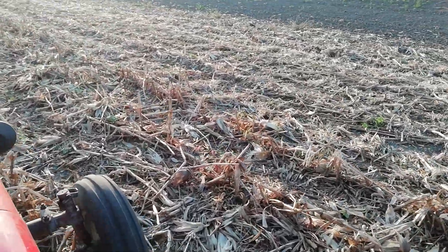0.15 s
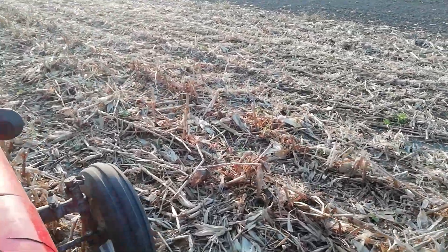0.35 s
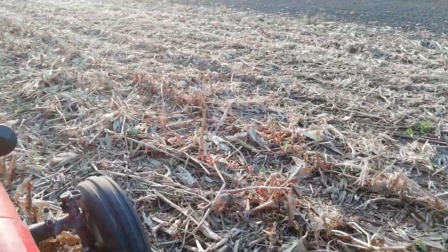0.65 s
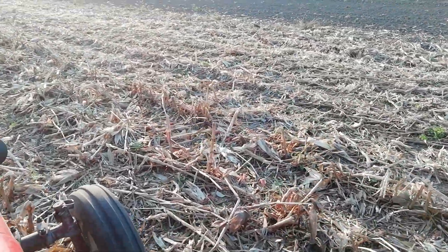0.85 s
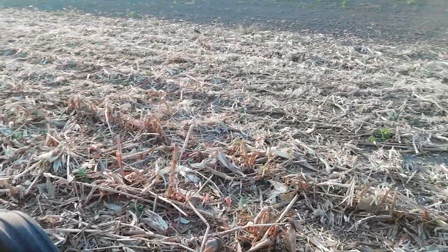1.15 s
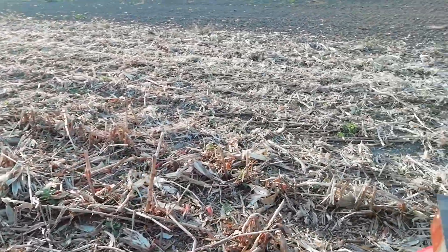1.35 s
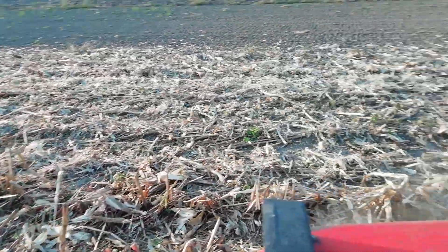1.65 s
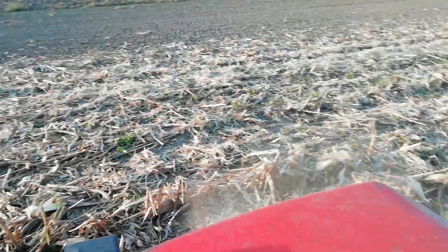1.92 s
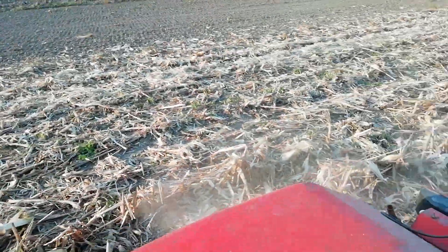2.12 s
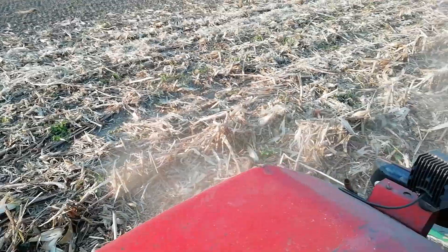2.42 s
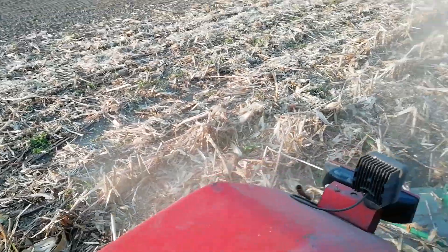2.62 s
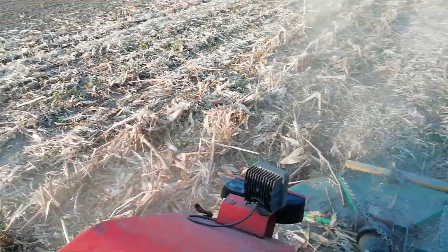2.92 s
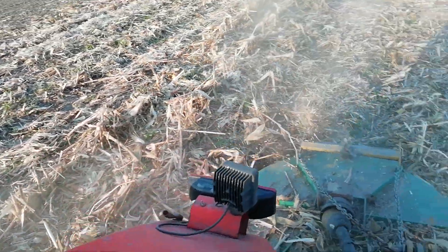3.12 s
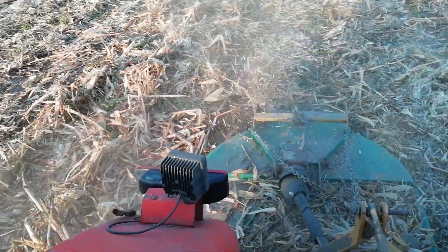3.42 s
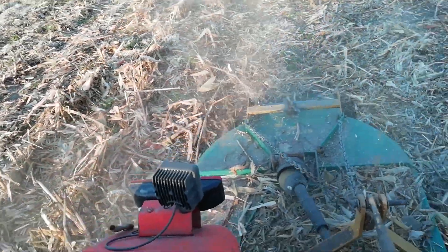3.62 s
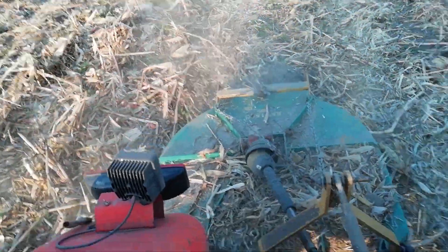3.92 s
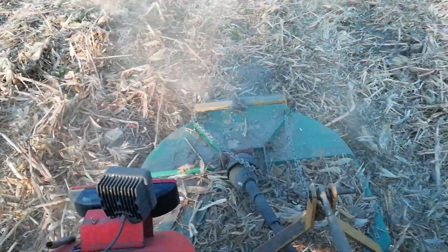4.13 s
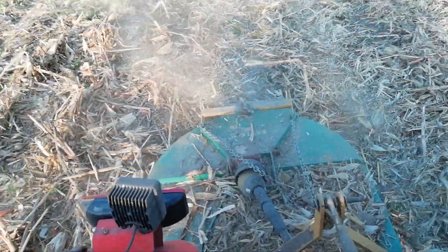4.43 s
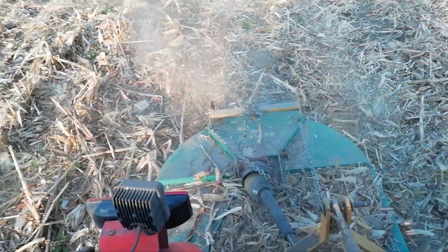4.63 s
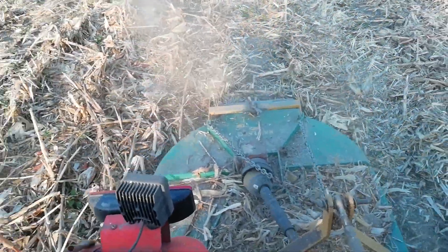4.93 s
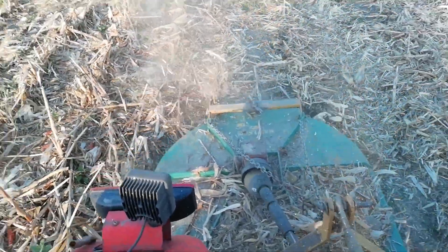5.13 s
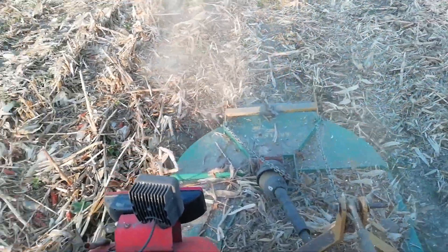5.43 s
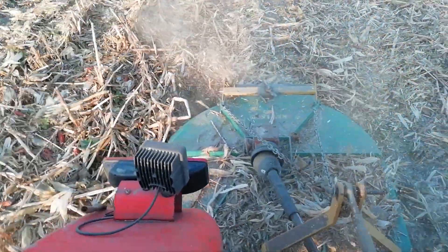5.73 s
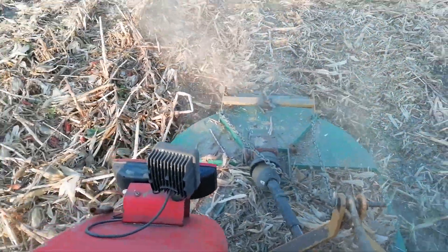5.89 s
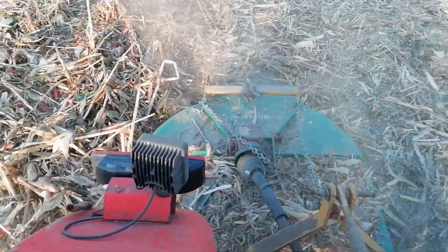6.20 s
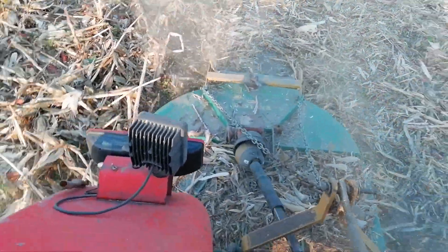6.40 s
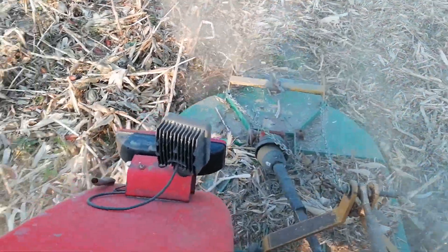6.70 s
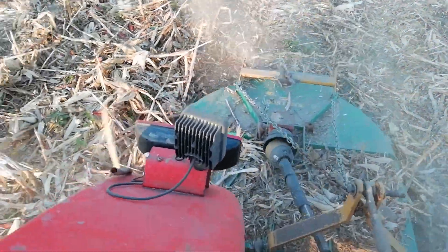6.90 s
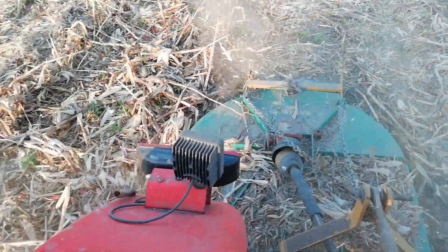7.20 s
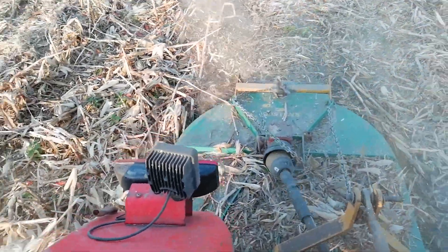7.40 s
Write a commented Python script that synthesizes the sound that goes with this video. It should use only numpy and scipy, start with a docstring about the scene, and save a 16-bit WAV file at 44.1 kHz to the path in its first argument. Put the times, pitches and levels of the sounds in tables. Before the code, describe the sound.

Heard from a tractor seat in an open field: a diesel engine drones and clatters steadily with a thin gear whine, over rushing hiss. After about a second and a half the microphone swings back to the rotary mulcher; whine and clatter recede, while a fast-throbbing roar and crackling hiss take over, with hard stalk strikes singly and in rapid bursts. The level ducks abruptly.

```python
"""A clattering diesel engine, then a throbbing, crackling hiss: a rotary mulcher behind a tractor in dry maize.
The microphone is at the driver's seat. It faces the engine ahead, then turns back towards the mulcher.
Engine tones are sines locked to the firing rate; clatter, roar and hiss are coloured noise that pulses with
the firings or with about 44 blade passes a second. Bursts of noise make the hard strikes. The recorder ducks
abruptly: some dips are written into the level curves, and a limiter adds more on peaks."""
import sys
import numpy as np
from scipy import signal
from scipy.fft import rfft, irfft, next_fast_len
from scipy.io import wavfile
from scipy.ndimage import uniform_filter1d, map_coordinates

SR = 44100
rng = np.random.default_rng(int(sys.argv[2]) if len(sys.argv) > 2 else 0)


def dump_mix(stems):
    """Bounce the given channels to the path in sys.argv[1] as a 16-bit WAV at rate SR."""
    frames = np.atleast_2d(stems).T  # one column per channel
    limited = np.clip(frames, -1, 1)  # hard clip at full scale
    pcm = np.round(limited * 32767).astype(np.int16)
    wavfile.write(sys.argv[1], SR, pcm)


N = 332955


def amp(db):
    """Decibels to gain."""
    return 10 ** (np.asarray(db) / 20)


def unit(x):
    """Scaled to rms 1."""
    return x / np.sqrt(np.mean(x ** 2) + 1e-20)


def along(points, hz):
    """Values of a (pitch_hz, value) table, read on a log frequency axis."""
    f, v = np.transpose(points)
    return np.interp(np.log(hz + 1), np.log(f + 1), v)


def curves(rows):
    """One value per sample for each column after the time."""
    s, *cols = np.transpose(rows)
    return [np.interp(np.arange(N) / SR, s, c) for c in cols]


def wobble(rate):
    """A smooth random curve through rate knots a second."""
    knots = rng.standard_normal(int(N * rate / SR) + 4)
    coarse = np.arange(0, N + 32, 32)  # samples
    values = map_coordinates(knots, [coarse * rate / SR])
    return np.interp(np.arange(N), coarse, values)


def filtered(x, response):
    """The sound x with its spectrum multiplied by a response of frequency."""
    m = next_fast_len(N + SR // 4, True)
    spectrum = rfft(x, m) * response(np.fft.rfftfreq(m, 1 / SR))
    return irfft(spectrum, m)[..., :N]


def add(track, s, sound):
    """Mix a sound into the track at time s."""
    part = track[..., max(round(s * SR), 0):][..., :sound.shape[-1]]
    part += sound[..., :part.shape[-1]]


def leaned(channels, tilt):
    """Left and right set apart by a tilt table, half of it on each side."""
    return filtered(channels, lambda hz: amp(np.outer([.5, -.5], along(tilt, hz))))


# stereo width of the noisy sources: (pitch_hz, side_minus_mid_db)
STEREO_WIDTH = [(40, -22), (90, -18), (180, -15), (350, -5.5), (600, 0), (1400, -4.5), (3000, 0.5),
                (15000, .5)]


def placed(pair, spectrum, tilt):
    """Two unrelated signals, coloured and spread as mid and side; the centre has rms 1."""
    def colour(hz):
        width = np.array([np.ones_like(hz), amp(along(STEREO_WIDTH, hz))])
        return amp(along(spectrum, hz)) * width
    mid, side = filtered(pair, colour)
    channels = leaned(np.array([mid + side, mid - side]), tilt)
    return channels / (np.std(channels.mean(axis=0)) + 1e-12)


# microphone at the seat: (start_s, direction, 0 = towards the engine, 1 = towards the mulcher)
MIC_DIRECTION = [(0, 0.036), (1.35, 0.054), (1.7, .5), (2.2, 0.65), (3, 0.93), (7.55, .97)]


def facing():
    """How far the microphone has swung from the engine towards the mulcher, 0 to 1."""
    return np.clip(curves(MIC_DIRECTION)[0], 0, 1)


def turned(ahead, behind):
    """Equal-power blend as the microphone swings round."""
    swing = facing()
    return np.sqrt(1 - swing) * ahead + np.sqrt(swing) * behind


def throb(cycles, rise, fall):
    """A swell of height 1 in every cycle; rise and fall are shares of the cycle."""
    u = cycles % 1
    shape = (1 - np.exp(-u / rise)) * np.exp(-u / fall)
    return shape / shape.max()


def chipped(noise, depth_db):
    """Chips of stalk: noise raised and lowered in narrow random bands for a few milliseconds each."""
    z = signal.stft(noise, nperseg=128)[2]
    field = rng.standard_normal(z.shape[1:])
    field = uniform_filter1d(field, size=4, axis=0)  # across frequency
    field = uniform_filter1d(field, size=6, axis=1)  # across time
    return signal.istft(z * amp(depth_db * unit(field)), nperseg=128)[1][:, :N]


# brief narrow pings, origin unknown: (start_s, pitch_hz, level_db, swell_s)
PINGS = [(.72, 10400, -24, .006), (1.04, 10500, -18, .005), (1.21, 10600, -17, 0.0036),
         (1.345, 11300, -24, .005), (2.16, 5060, -19, 0.0082), (3.14, 4050, -31, .008),
         (3.395, 4560, -18, 0.0046), (4.245, 2600, -26, .014), (4.9, 5800, -25, 0.0069),
         (6.82, 2567, -18, .014), (7.01, 2560, -22, .012)]


def pings(blur_rad):
    """Each ping is one partial that swells and dies, roughened by a randomly drifting phase."""
    t = np.arange(SR // 8) / SR
    track = np.zeros((2, N))
    for s, hz, db, swell in PINGS:
        steps = rng.standard_normal((2, len(t)))
        drift = blur_rad * np.sqrt(hz / SR) * np.cumsum(steps, axis=1)
        envelope = t / swell * np.exp(1 - t / swell)  # peaks at 1 after the swell time
        add(track, s, amp(db) * envelope * np.sin(2 * np.pi * hz * t + drift))
    return track


# gear whine: (pitch_hz at the mean engine speed of the first second, level_db before wavering and shading)
GEAR_WHINE = [(764.4, -33.5), (1135, -39), (1497, -25.5), (1879, -39), (1950, -43)]


def gears(speed, blur_rad, behind_db):
    """Gear teeth whine in step with the engine, blurred by backlash and shaded as the microphone turns."""
    seconds = np.cumsum(speed / speed[:SR].mean()) / SR  # time stretched by engine speed
    whine = np.zeros((2, N))
    for hz, db in GEAR_WHINE:
        backlash = blur_rad * wobble(35) + 1.2 * wobble(12)
        angle = 2 * np.pi * (hz * seconds + rng.random((2, 1))) + backlash
        whine += amp(db + 1.9 * wobble(19)) * np.sin(angle)
    shade = amp(behind_db * np.sqrt(facing()))
    return whine * shade * amp([[-1], [2]])  # left, right dB


# knocking engine block: (pitch_hz, relative_level_db)
CLATTER_SPECTRUM = [(260, -31), (450, -7.5), (539, -14.5), (742, -6), (1070, -2), (1170, 1.5), (1630, -5.5),
                    (1940, 0), (2120, -2.5), (3200, -14), (4160, -47), (7040, -120)]
# sources heard ahead of the seat: (pitch_hz, left_minus_right_db)
AHEAD_TILT = [(300, 0), (650, 4), (1000, 3.5), (1500, -8.5), (2500, -2), (4000, -2.5), (5500, 2.5),
              (8000, 5), (11000, -4), (15000, -2)]


def clatter(firings, knock_db):
    """Every combustion knocks the engine block, at uneven strength."""
    knocks = throb(firings, rise=.05, fall=.25) * (1 + 0.61 * wobble(58))
    noise = rng.standard_normal((2, N)) * amp(knock_db * knocks)
    return placed(noise, CLATTER_SPECTRUM, AHEAD_TILT)


# exhaust lines, with the cooling fan at 4.212:
# (multiple of the firing rate, relative_level_ahead_db, relative_level_behind_db)
ENGINE_LINES = [(.75, -16, -19), (1, -0.5, -1), (1.25, -10, -15), (1.5, -13, -8.5), (1.75, -6.5, -5.5),
                (2, -16, -2), (2.25, -17, -13.5), (2.5, -14, -7), (2.75, -21, -16), (3, -6, -8),
                (3.25, -14, -9), (3.75, -5, -3.5), (4, -3, -4.5), (4.212, -6, -5), (4.5, -10, -10.5),
                (4.75, -18, -12.5), (5, -20, -19), (5.25, -20, -24), (5.75, -18, -18), (6.25, -18, -17.5),
                (6.75, -18, -21), (7, -15.5, -22)]
# exhaust gas: (pitch_hz, relative_level_db)
RUMBLE_SPECTRUM = [(25, -27), (42, -16), (65, -20), (92, 0), (150, -4), (195, -1), (245, -2.5), (295, -8),
                   (365, -5.5), (440, -15), (560, -22), (750, -23), (1200, -120)]


def exhaust(firings, waver_db, waver_rad, tone_db, rumble_db):
    """Unequal cylinders give lines at quarter orders that beat with the fan; gas rumbles with every firing."""
    swing = facing()
    tone, power = np.zeros(N), np.zeros(N)
    for order, ahead_db, behind_db in ENGINE_LINES:
        gain = amp(ahead_db + (behind_db - ahead_db) * swing)
        unsteady = np.clip(order / 2, 0, 1) ** 2  # lines below twice the firing rate waver less
        angle = 2 * np.pi * (order * firings + rng.random()) + unsteady * waver_rad * wobble(7)
        tone += gain * amp(unsteady * waver_db * wobble(9)) * np.sin(angle)
        power += gain ** 2 / 2
    puff_db = 4 * throb(firings, rise=0.21, fall=0.57) + 1.55 * wobble(45)
    puffs = rng.standard_normal((2, N)) * amp(puff_db)
    rumble = placed(puffs, RUMBLE_SPECTRUM, AHEAD_TILT)
    return amp(tone_db) * tone / np.sqrt(power) + amp(rumble_db) * rumble


# bunching of the cutting at each blade pass: (start_s, depth_db before the factors where it is used)
BLADE_BITE = [(0, 1.9), (1.5, 3.3), (2.2, 5), (3.3, 3.8), (4.8, 4.7), (7.55, 3.49)]
# mulcher deck: (pitch_hz, relative_level_db)
ROAR_SPECTRUM = [(260, -33), (450, -10), (600, -11), (760, -6.5), (1000, 0), (1250, -0.5), (1490, 1),
                 (1750, -1), (2400, -5.5), (3200, -10.5), (4200, -24), (7000, -120)]
# sources heard behind the seat: (pitch_hz, left_minus_right_db)
BEHIND_TILT = [(300, 3), (550, -7.5), (800, -4), (1500, -3.5), (2500, -5.5), (4500, -6.5), (7000, -3),
               (8500, 2.5), (10000, 2.5), (13000, 0.5)]


def deck_roar(passes):
    """Churning stalks roar under the deck, swelling at half the bite depth with each blade pass."""
    swell = amp(.5 * curves(BLADE_BITE)[0] * throb(passes, rise=.15, fall=0.33))
    churn = chipped(rng.standard_normal((2, N)), depth_db=1.5) * swell
    return placed(churn, ROAR_SPECTRUM, BEHIND_TILT)


# stones on the steel deck: (start_s, relative_peak_db)
STONE_HITS = [(1.7549, -8), (7.2812, -4)]
# ringing modes of the deck: (pitch_hz, relative_level_db, t60_s)
DECK_MODES = [(2900, -6, .018), (3090, -1, 0.035), (3260, 0, .02), (6510, 5, 0.007), (7000, -8, .012)]


def stones(ring_db):
    """A stone rattles along the deck: a decaying noise that rings its modes."""
    t = np.arange(SR // 8) / SR
    ring = sum(amp(db - 60 * t / t60) * np.sin(2 * np.pi * hz * t) for hz, db, t60 in DECK_MODES)
    track = np.zeros((2, N))
    for s, db in STONE_HITS:
        rattle = rng.standard_normal((2, len(t))) * amp(-60 * t / 0.097)  # t60 in s
        clang = signal.fftconvolve(rattle, ring[None], axes=1)
        add(track, s, amp(db + ring_db) * clang / np.abs(clang).max())
    return track


BLADE_HZ = 44.4  # nominal blade passes a second


def blade_passes():
    """The running count of blade passes, nudged so that each hard strike falls on a whole pass."""
    times = np.array(STALK_STRIKES)[:, 0]
    counts = np.cumsum(np.round(np.diff(times, prepend=times[0]) * BLADE_HZ))
    t = np.arange(N) / SR
    return BLADE_HZ * t + np.interp(t, times, counts - BLADE_HZ * times)


def shredding(passes, snap_rate, snap_db, spread_db, uneven, clump_db):
    """Rushing chaff plus countless tiny snaps, both swelling as each blade bites."""
    index = (np.floor(passes) - np.floor(passes.min())).astype(int)
    mouthful = np.clip(1 + uneven * rng.standard_normal(1024)[index], 0, 2)  # one size per pass
    bite_db = curves(BLADE_BITE)[0] * mouthful * throb(passes, rise=0.027, fall=.16)
    feed = amp(bite_db + clump_db * wobble(260))
    feed /= np.sqrt(uniform_filter1d(feed ** 2, SR // 8))  # evens out the slower loudness
    sizes = amp(spread_db * np.clip(rng.standard_normal(N), -2, 2)) ** 2
    snaps = (rng.random(N) < snap_rate / SR) * sizes
    energy = signal.lfilter([1], [1, -np.exp(-1 / (0.00033 * SR))], snaps)  # decay in s
    chaff = chipped(rng.standard_normal((2, N)), depth_db=1.5)
    return chaff * feed * np.sqrt(1 + amp(snap_db) ** 2 * energy / energy.mean())


# shredding as heard with the microphone towards the engine: (pitch_hz, relative_level_db)
HISS_FACING_ENGINE = [(1470, -19), (2500, -4.5), (3240, -1.5), (3750, 0.5), (5050, -7.5), (6150, -5.5),
                      (6490, -6), (7450, 0), (8480, -1.5), (11900, -15.5), (14700, -19), (15500, -21)]
# shredding as heard with the microphone towards the mulcher: (pitch_hz, relative_level_db)
HISS_FACING_MULCHER = [(1470, -28), (2500, -7), (4710, -1), (5570, -4.5), (7860, 1.5), (8480, -1),
                       (10700, -17.5), (15500, -22.5)]


def shredding_hiss(chaff):
    """The same chaff takes on another colour and stereo lean as the microphone turns."""
    ahead = placed(chaff, HISS_FACING_ENGINE, AHEAD_TILT)
    behind = placed(chaff, HISS_FACING_MULCHER, BEHIND_TILT)
    return turned(amp(-1.14) * ahead, amp(-1.04) * behind)


# a blade hits a thick stalk or clod: (start_s, relative_peak_db, low_knock_db relative to the crack)
STALK_STRIKES = [(1.7599, -4, -18), (2.362, -5, -17), (2.3879, -3, -21), (2.4119, -2, -22),
                 (2.4967, -5, -19), (2.7094, -7, -13), (2.9472, -3, -17), (2.9701, -4, -16),
                 (2.9936, -4, -23), (3.0165, -4, -20), (3.0395, -3, -16), (3.0629, -2, -19),
                 (3.0859, -4, -17), (3.1088, -6, -13), (3.1318, -2, -24), (3.1547, -6, -19),
                 (3.1772, -3, -23), (3.1996, -1, -20), (3.244, -6, -9), (3.2685, -2, -18),
                 (3.3752, -7, -10), (3.3972, -5, -17), (3.4411, -8, -8), (3.7189, -4, -20),
                 (3.7778, -2, -16), (3.8242, -5, -14), (3.8492, -3, -18), (4.0257, -4, -15),
                 (4.2752, -4, -15), (4.3246, -2, -17), (4.4992, -4, -17), (4.5441, -3, -18),
                 (4.59, -5, -14), (4.6129, -4, -15), (4.6364, -6, -15), (4.6588, -4, -17),
                 (4.6813, -4, -15), (4.7027, -4, -13), (4.7242, -5, -13), (4.7451, -3, -16),
                 (4.7686, -5, -13), (4.8174, -4, -19), (4.9462, -5, -15), (4.9911, -3, -16),
                 (5.4016, -3, -18), (5.4485, -4, -16), (5.6196, -2, -12), (5.665, -4, -13),
                 (5.7573, -5, -15), (5.8716, -5, -17), (6.0921, -4, -16), (6.2063, -5, -17),
                 (6.2282, -5, -10), (6.3829, -3, -13), (6.4732, -6, -15), (6.56, -2, -18),
                 (6.6273, -2, -16), (6.6722, -2, -15), (6.6957, -4, -17), (6.7396, -4, -16),
                 (6.8713, -2, -17), (7.2784, -2, -19), (7.5168, -6, -15)]
# sharp crack: (pitch_hz, relative_level_db)
CRACK_SPECTRUM = [(400, -38), (1300, -13.5), (4000, -3.5), (6000, -7.5), (8000, 3.5), (10000, -17),
                  (15500, -25)]


def strikes(body_db, t60, spread_db):
    """A thick stalk bursts: a sharp crack from one spot, scattered by the deck, which adds a duller knock."""
    t = np.arange(SR // 25) / SR
    cracks, knocks = np.zeros(N), np.zeros(N)
    toughnesses = rng.uniform(.75, 1.3, len(STALK_STRIKES))  # tougher stalks die away more slowly
    for (s, db, low_db), toughness in zip(STALK_STRIKES, toughnesses):
        burst = amp(db - 60 * t / (t60 * toughness)) * (1 - np.exp(-t / .0004))
        add(cracks, s, burst)
        add(knocks, s, amp(low_db) * burst)
    chips = chipped(rng.standard_normal((2, N)), depth_db=1.0)
    crack = unit(filtered(chips, lambda hz: amp(along(CRACK_SPECTRUM, hz))))
    thud = rng.standard_normal((2, N))
    knock = unit(filtered(thud, lambda hz: amp(along(ROAR_SPECTRUM, hz))))
    direct, scattered = .63 * (cracks * crack + amp(body_db) * knocks * knock)
    channels = direct + amp(spread_db) * np.array([scattered, -scattered])
    return leaned(channels, BEHIND_TILT)


# engine speed: (start_s, firing_rate_hz)
ENGINE_SPEED = [(0.0, 57.5), (0.6, 57.53), (1.3, 57.98), (1.8, 58.15), (2.4, 56.96), (3.2, 56.63),
                (3.9, 57.12), (4.8, 57.47), (5.6, 56.7), (6.5, 57.86), (7.55, 57.1)]
# heard levels of exhaust, clatter or roar, and hiss, including the recorder's abrupt dips and recoveries:
# (start_s, exhaust_level_db, clatter_and_deck_roar_level_db, shredding_hiss_level_db)
HEARD_LEVELS = [(0.0, -17.5, -23.5, -21), (0.04, -23.5, -19.5, -22.5), (0.08, -19.5, -20, -20),
                (0.38, -21, -21.5, -18.5), (0.48, -22, -22, -22), (0.53, -19, -21, -20),
                (0.63, -20.5, -21, -21.5), (0.67, -24, -25.5, -22.5), (0.73, -20.5, -21.5, -22),
                (0.78, -23, -22.5, -22), (0.88, -20, -20.5, -19.5), (1.51, -19.5, -22, -18.5),
                (1.53, -21.5, -24.5, -22.5), (1.7, -18, -23, -22), (1.74, -24.5, -29.5, -24.5),
                (1.83, -19.5, -21.5, -20.5), (1.95, -20, -25, -21), (2.04, -19, -24.5, -19),
                (2.08, -26, -30, -24.5), (2.12, -21.5, -27.5, -21), (2.27, -22.5, -22.5, -22),
                (2.33, -18, -22, -17.5), (2.37, -25.5, -26.5, -20.5), (2.44, -28, -29, -25.5),
                (2.48, -26, -25.5, -21.5), (2.52, -25, -29, -23), (2.54, -22.5, -27.5, -17),
                (2.59, -22.5, -25, -24.5), (2.69, -21, -23.5, -19), (2.73, -22.5, -24.5, -20.5),
                (2.9, -20.5, -21.5, -19.5), (2.94, -21.5, -26, -21.5), (2.98, -30, -31, -27),
                (3.0, -32, -34, -26), (3.03, -23, -29, -20.5), (3.07, -31, -29, -27),
                (3.17, -23, -28.5, -25.5), (3.26, -27, -26.5, -23.5), (3.55, -21, -23, -21.5),
                (3.68, -19, -20.5, -18), (3.72, -26, -27, -23), (3.76, -21.5, -25, -26),
                (3.78, -22, -22.5, -18.5), (3.87, -22.5, -24, -19), (3.93, -23, -21, -20),
                (3.97, -26, -26, -17), (4.0, -26, -26.5, -23), (4.04, -21, -22.5, -15),
                (4.08, -25, -27, -23), (4.22, -20.5, -21, -17.5), (4.29, -25, -25, -20),
                (4.37, -23, -21.5, -14.5), (4.39, -24, -24.5, -19), (4.58, -22.5, -24.5, -20.5),
                (4.63, -26, -30.5, -26), (4.73, -27, -26, -17.5), (4.84, -28, -28.5, -23.5),
                (4.9, -22.5, -23, -20), (5.0, -22.5, -24, -17.5), (5.05, -19.5, -23.5, -19),
                (5.09, -24.5, -24, -19), (5.22, -21.5, -23.5, -20), (5.23, -25.5, -26.5, -22),
                (5.38, -20.5, -22.5, -21), (5.45, -23.5, -25, -16), (5.49, -22, -24, -18.5),
                (5.7, -25.5, -24.5, -19.5), (5.82, -23.5, -25, -20.5), (5.84, -25, -24.5, -20),
                (5.91, -23, -26, -23), (6.03, -20, -21, -20), (6.12, -24.5, -23.5, -19),
                (6.22, -26.5, -29, -23), (6.27, -24, -21.5, -20.5), (6.31, -24, -25, -20.5),
                (6.33, -20, -23.5, -21), (6.39, -23, -21.5, -15.5), (6.45, -27.5, -26, -25),
                (6.54, -19.5, -23.5, -19.5), (6.58, -28.5, -26.5, -22.5), (6.62, -20, -22, -22.5),
                (6.69, -29.5, -26.5, -20), (6.73, -22, -25, -20.5), (6.83, -22, -24.5, -20),
                (6.94, -28.5, -26.5, -22), (6.98, -23, -23, -19.5), (7.15, -22, -21, -18.5),
                (7.23, -17.5, -20.5, -19.5), (7.3, -24.5, -24, -21.5), (7.34, -24.5, -22, -23.5),
                (7.38, -18, -22, -20.5), (7.42, -29, -23.5, -19.5), (7.51, -20.5, -25.5, -23),
                (7.55, -24, -25, -22)]


def scene():
    """Engine ahead of the driver's seat, mulcher behind it."""
    speed, = curves(ENGINE_SPEED)
    exhaust_db, roar_db, hiss_db = curves(HEARD_LEVELS)
    firings = np.cumsum(speed) / SR
    passes = blade_passes()
    pipe = exhaust(firings, waver_db=2.5, waver_rad=0.45, tone_db=-3.0, rumble_db=-3.5)
    chaff = shredding(passes, snap_rate=1400, snap_db=-7.0, spread_db=3.5, uneven=0.67, clump_db=0.5)
    roar = turned(amp(.5) * clatter(firings, knock_db=0.5), deck_roar(passes))
    hiss = shredding_hiss(chaff)
    whine = gears(speed, blur_rad=0.64, behind_db=-13)
    steady = amp(exhaust_db) * pipe + amp(roar_db) * roar + amp(hiss_db) * hiss + whine
    cracks = strikes(body_db=7, t60=.018, spread_db=-3)
    return steady + cracks + stones(ring_db=2.5) + pings(blur_rad=0.28)


def limiter(x, ceiling, release_db):
    """Peaks on either channel pull both down at once; the gain climbs back by release_db every second."""
    over = 20 * np.log10(np.maximum(1, np.abs(x).max(axis=0) / ceiling))
    climb = release_db * np.arange(N) / SR
    reduction = np.maximum.accumulate(over + climb) - climb
    return x * amp(-uniform_filter1d(reduction, size=16))


TOP_HZ = 15750  # band limit of the recorder


def record(dry):
    """The recorder limits peaks, rounds off what slips through and keeps nothing above its band limit."""
    x = limiter(dry, ceiling=1.2, release_db=220)
    x = x / (1 + np.abs(x / .95) ** 6) ** (1 / 6)  # soft clip
    return filtered(x, lambda hz: hz < TOP_HZ)


dry = scene()
out = record(dry)
dump_mix(out)
```